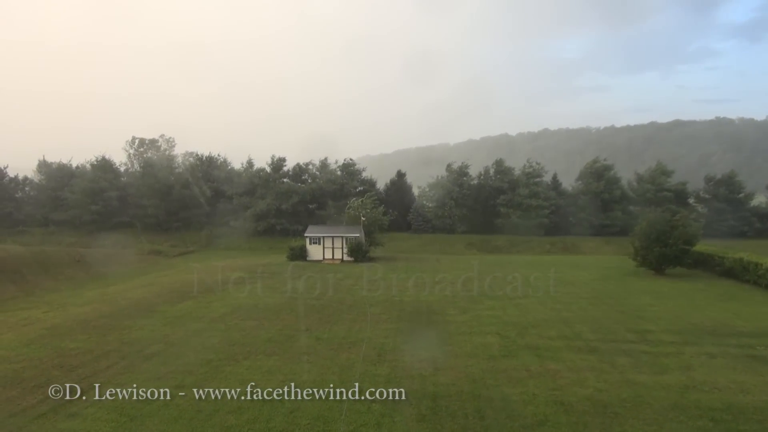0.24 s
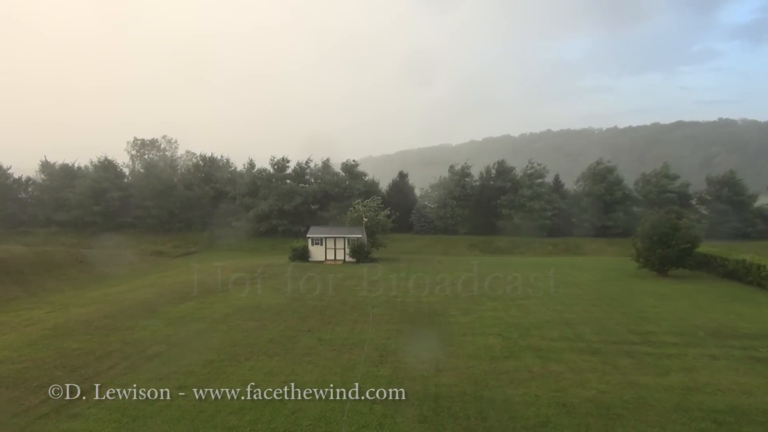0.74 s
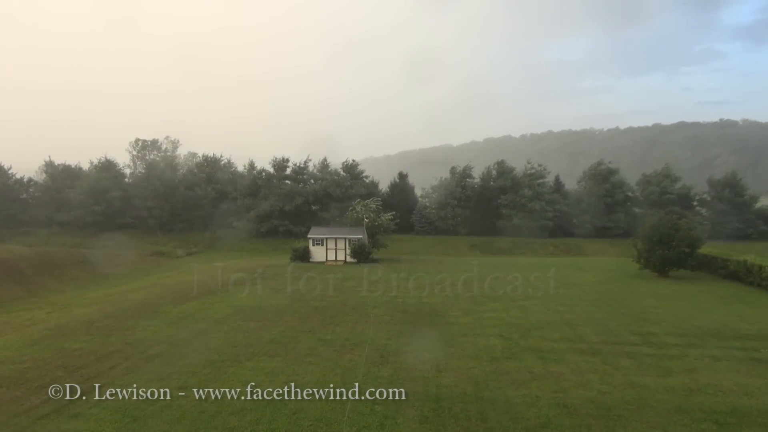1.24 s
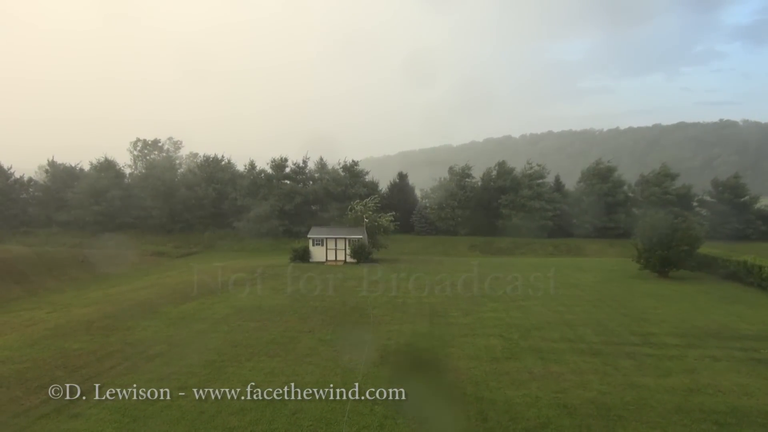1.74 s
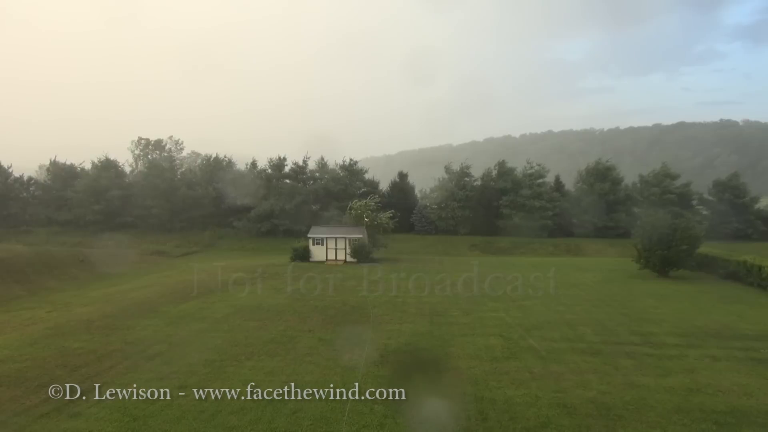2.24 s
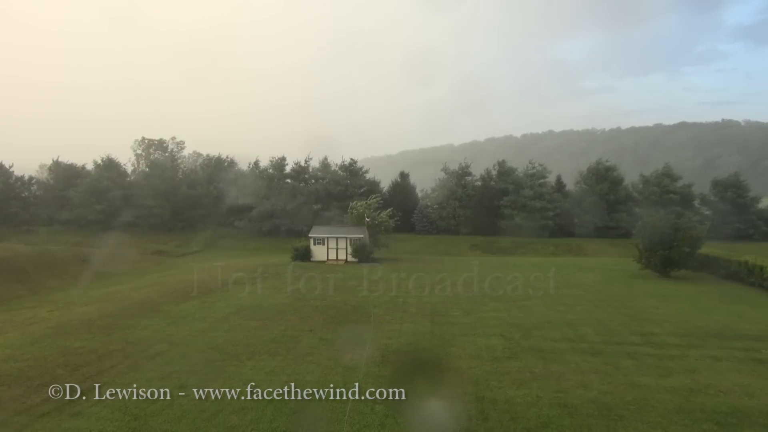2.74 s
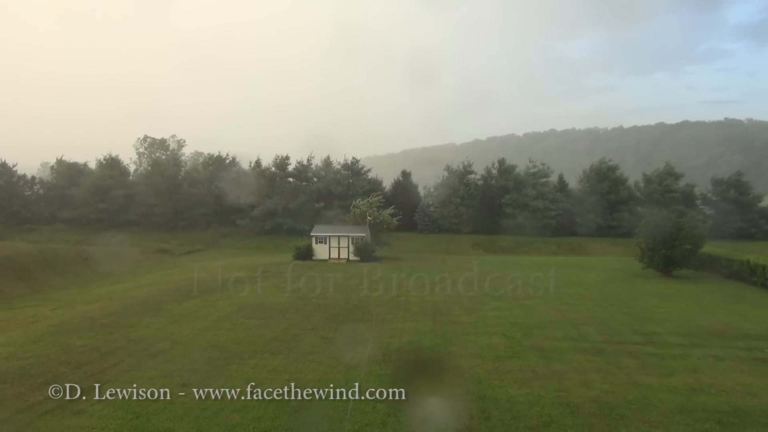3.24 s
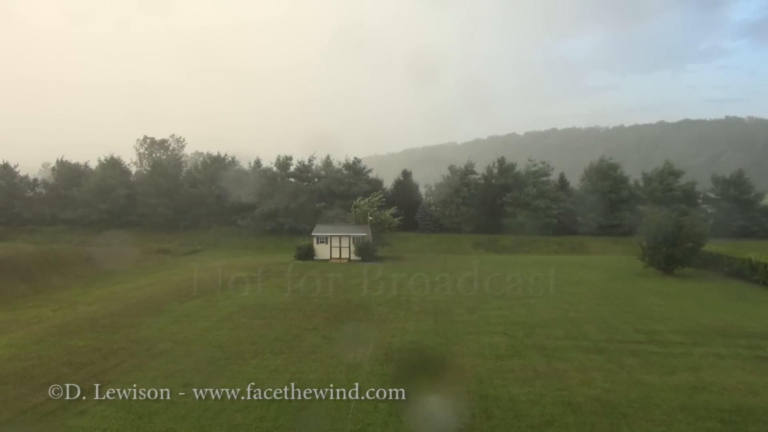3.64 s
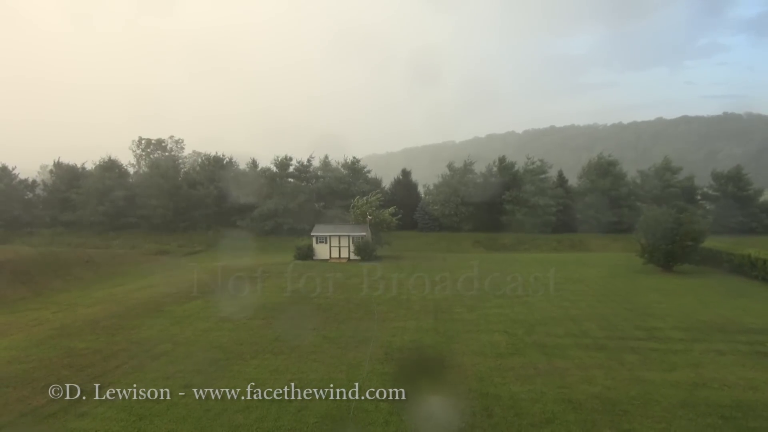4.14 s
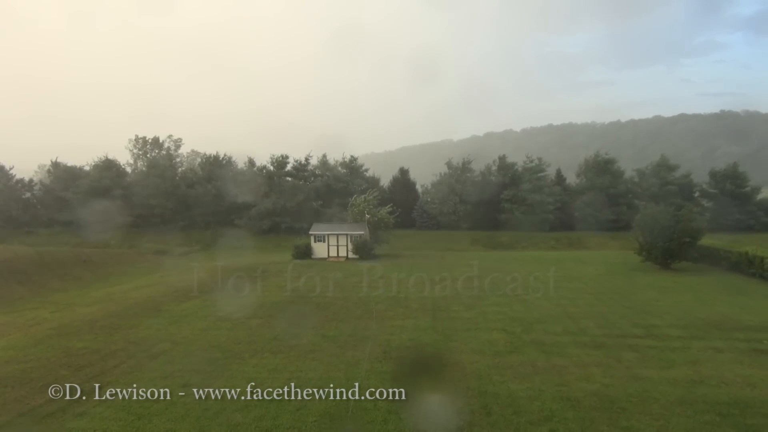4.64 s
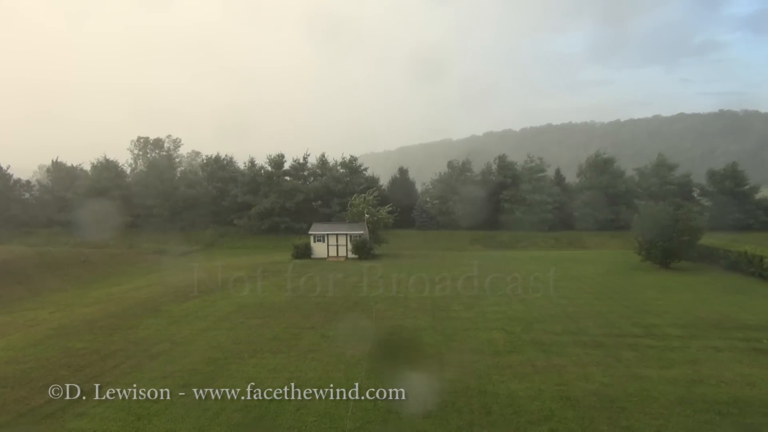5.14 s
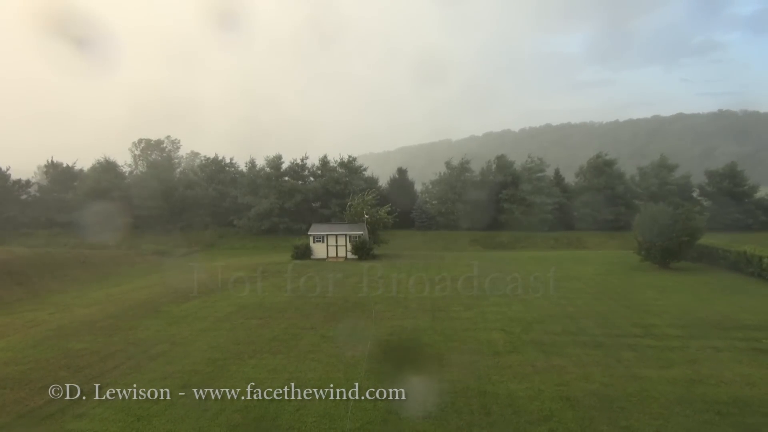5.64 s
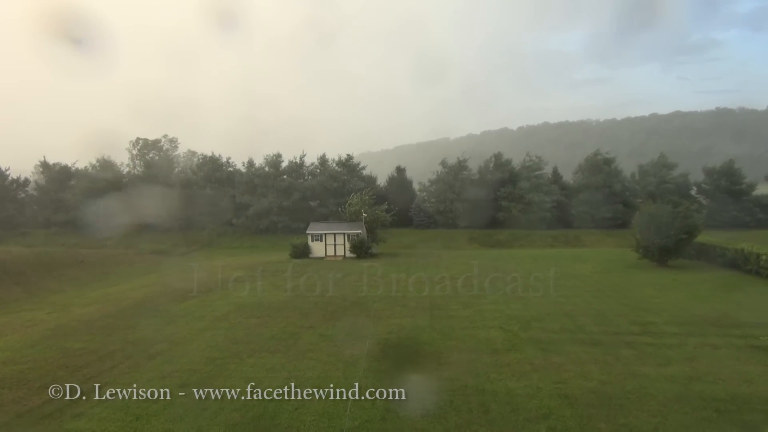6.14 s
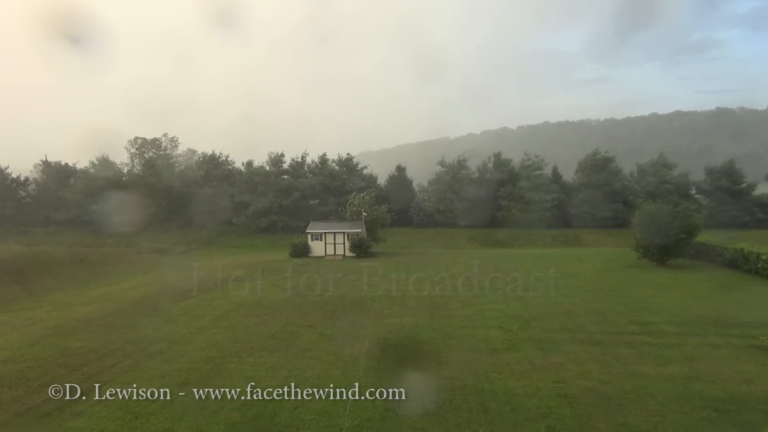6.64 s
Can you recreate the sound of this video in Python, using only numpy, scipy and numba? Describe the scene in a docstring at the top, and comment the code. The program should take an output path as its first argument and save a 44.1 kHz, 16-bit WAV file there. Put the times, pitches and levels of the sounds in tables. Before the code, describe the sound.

From 0 to about 1.4 s a low turbulent gust rushes past in several surges, fluttering over a steady, slightly grainy rain hiss from lawn and trees; only sparse faint ticks touch the glass. The gust drops away by 1.7 s, just as drops start hitting a pane close to the microphone: a rapid cluster of sharp cracks from 1.4 to 2.0 s. Irregular hits continue, with strong snaps near 2.7, 3.0, 3.2 and 3.4 s, a bright splashy group around 4.1-4.2 s, a hard crack and dull knock at 5.2 s, and hollow ringing tocks near 5.7 and 6.2 s. Lighter clicks and fine patter fill between. Cracks are dry and very short, with tiny spray and glassy ring. Uneven breeze and deep buffeting swell softly below. After 6.2 s heavy hits thin out, leaving hiss, a few ticks around 6.7 s and a last small puff.

```python
"""A gust rushes past in surges, dies, and leaves an uneven breeze and low buffeting: coloured noise on shared eddies.
Wind-driven drops strike a pane of glass close to the microphone: each cracks, sprays and briefly rings the pane.
Lighter drops click, fat ones knock dully and fine ones patter, each a short push through filters.
Rain hisses on the lawn and trees behind: noise with a grain of random clicks.
A gain control ducks after the hardest hits, then peaks are clipped and the extreme treble is cut."""
import sys
import numpy as np
from scipy import signal
from scipy.fft import rfft, irfft
from scipy.io import wavfile
from scipy.ndimage import uniform_filter1d
from numba import njit

SR = 44100
rng = np.random.default_rng(int(sys.argv[2]) if len(sys.argv) > 2 else 0)


def generate_wav(sig):
    """Save sig (samples, or channels by samples) to the path in sys.argv[1] as 16-bit PCM at SR."""
    pcm = np.round(np.clip(np.atleast_2d(sig).T, -1, 1) * 32767).astype(np.int16)
    wavfile.write(sys.argv[1], SR, pcm)


N = 304638
TIME = np.arange(N) / SR  # s
HIT = 2048  # length of one short sound, samples
HIT_TIME = np.arange(HIT) / SR  # s

# spectrum of a crack on the glass: frequency_hz [Hz], level_db [dB, relative]
CRACK_SPECTRUM = [(300, -57.5), (800, -2), (1400, 7), (2200, 8), (6000, 3), (8500, -20), (16000, -16)]
# spectrum of a heavy drop's spray: frequency_hz [Hz], level_db [dB, relative]
SPRAY_SPECTRUM = [(3000, -22.5), (5500, -2), (7200, 4.5), (8800, -3.5), (10900, -2), (12500, -6.5),
                  (14000, -14), (16000, 0)]
# modes of the pane, a short hollow tock over a longer ring:
# nominal frequency_hz [Hz], drive_db [dB, relative], nominal decay_t60_s [s]
PANE_MODES = [(1170, -10.5, 0.0067), (1371, 28.5, 0.038), (1510, 13.5, 0.033), (1660, 14.5, 0.016),
              (2600, 1, 0.066), (3900, -2.5, 0.048)]


def pane_ring(port_lag_rad):
    """Decaying modes; where the drop lands sways each one's drive, pitch, decay and lag between the ports."""
    ring = 0
    chances = rng.standard_normal((len(PANE_MODES), 4))
    for (mode_hz, drive_db, t60_s), (detune, size, lag, damping) in zip(PANE_MODES, chances):
        ring_hz = mode_hz * (1 + .02 * detune)
        port_phase = (.3 * lag - port_lag_rad / 2) * np.array([[1], [-1]])
        phase = 2 * np.pi * ring_hz * HIT_TIME + port_phase
        decay = np.exp(-np.log(1000) * HIT_TIME / t60_s * np.exp(.17 * damping))
        ring = ring + undb(drive_db + 2.5 * size) * decay * np.sin(phase)
    return ring


def drop(crack_db, ring_db, spray_db, crack_hz, splash_s):
    """One heavy drop: a sharp push and a splash crack on the glass, throw fine spray and ring the pane."""
    splash_db, rattle_db, rattle_s = -15, -32, 0.0068
    edge_db, edge_s = -12, 0.00062  # echo from the frame: level, typical delay
    scatter, spray_s = 0.92, 0.0037
    chance = rng.standard_normal((3, HIT))
    splash = undb(splash_db) * np.exp(-HIT_TIME / splash_s) + undb(rattle_db) * np.exp(-HIT_TIME / rattle_s)
    push = (HIT_TIME == 0) + splash * chance[0]
    # the wave returns inverted from the frame, after a delay that gives every drop its own colour
    edge_delay = int(edge_s * SR * rng.uniform(.5, 1.8))
    push = push - undb(edge_db) * np.roll(push, edge_delay)
    # scattered paths through the glass differ for each port
    scattered = push + scatter * splash * chance[1:]
    crack = colour(resonate(scattered, crack_hz, 0.66 * crack_hz), CRACK_SPECTRUM)
    crack *= undb(crack_db) / np.abs(crack).max(axis=1).mean()
    ring = pane_ring(port_lag_rad=1.05)
    spray_source = np.array([push, splash * chance[1]]) * np.exp(-HIT_TIME / spray_s)
    spray = colour(diffuse(spray_source), SPRAY_SPECTRUM)
    return crack * pan(2) + strike(ring, ring_db) * pan(4) + strike(spray, spray_db)


# heavy drops on the glass, levels before trim:
# start_s [s], crack_peak_db [dB], ring_db [dB], spray_db [dB], crack_centre_hz [Hz]
HEAVY_DROPS = [(1.4316, -12.5, -37.5, -16.5, 3430), (1.5513, -8.5, -25.5, -24, 2230),
               (1.6163, -11, -24.5, -19, 2100), (1.8254, -11.5, -29, -27, 3900),
               (1.8562, -14.5, -25, -20, 4100), (1.936, -18, -31, -24.5, 4800),
               (1.9627, -16.5, -36, -13.5, 3560), (2.2145, -16.5, -29.5, -47, 2600),
               (2.413, -26, -35, -23, 2030), (2.733, -5, -22, -13, 3900), (2.9736, -15, -23.5, -23, 3400),
               (3.044, -6.5, -47, -25, 3750), (3.2220, -10.5, -22, -15.5, 1930),
               (3.3547, -23, -28.5, -29, 1920), (3.369, -20, -44, -22, 2070),
               (3.386, -14.5, -32.5, -17, 5260), (3.4372, -13.5, -19, -21, 3650),
               (3.497, -32, -34, -48, 1900), (3.8347, -10, -32, -23, 3150), (4.106, -17.5, -26, -21, 1820),
               (4.142, -6, -32, -18, 2240), (4.2062, -8, -22.5, -6.5, 3920), (4.326, -30, -32.5, -36, 1830),
               (4.5162, -9.5, -19.5, -17, 3100), (4.694, -14, -31, -33.5, 2870),
               (5.077, -19, -25.5, -21, 3600), (5.1292, -20, -31.5, -30, 1800),
               (5.1838, -4.5, -24, -11.5, 3340), (5.3144, -12.5, -30, -26, 2900),
               (5.579, -24, -30.5, -28, 2230), (5.7212, -11, -17.5, -17, 3400),
               (6.0767, -17.5, -37.5, -35, 3770), (6.2085, -9, -16, -14.5, 2820),
               (6.694, -24, -37, -32, 2260)]


def big_drops(crack_gain_db, ring_gain_db, spray_gain_db, splash_s, splatter):
    """Heavy drops close to the microphone; dry ones snap, those that throw much spray splatter for longer."""
    out = np.zeros((2, N))
    for start_s, crack_db, ring_db, spray_db, crack_hz in HEAVY_DROPS:
        length_s = splash_s * undb(splatter * min(spray_db - crack_db, 0))
        sound = drop(crack_db + crack_gain_db, ring_db + ring_gain_db, spray_db + spray_gain_db,
                     crack_hz, length_s)
        add(out, start_s, sound)
    return out


# spectrum of a small drop's spray: frequency_hz [Hz], level_db [dB, relative]
FINE_SPRAY_SPECTRUM = [(3000, -45), (6000, 19), (8500, -10.5), (12500, 9), (14500, 6)]


def tick(db, hz, width=0.76, spray_db=-9):
    """A small drop clicks at its own pitch over a faint crack of the glass; the higher the click, the more spray."""
    splash_s, splash_db = 0.0011, -12
    body_db, spray_db_per_octave = -9, 6
    chance = rng.standard_normal((3, HIT))
    splash = undb(splash_db) * np.exp(-HIT_TIME / splash_s)
    push = (HIT_TIME == 0) + splash * (chance[0] + .5 * chance[1:])
    click = resonate(resonate(push, hz, width * hz), hz, width * hz)
    body = colour(push, CRACK_SPECTRUM)
    spray = colour(push, FINE_SPRAY_SPECTRUM)
    spray_level_db = db + spray_db + spray_db_per_octave * np.log2(hz / 4000)
    return strike(click, db) + strike(body, db + body_db) + strike(spray, spray_level_db)


# lighter drops on the glass, levels before trim: start_s [s], level_db [dB], click_hz [Hz]
LIGHT_DROPS = [(0.988, -44, 5000), (1.424, -36, 6500), (1.484, -37, 5560), (1.656, -40, 7000),
               (1.71, -33, 4900), (1.753, -35, 4930), (1.802, -32, 6500), (1.999, -29, 4300),
               (2.019, -30, 3940), (2.092, -42, 6200), (2.179, -36.5, 5760), (2.310, -34.5, 3350),
               (2.6849, -26, 3900), (2.826, -35, 3300), (2.915, -34.5, 3900), (2.959, -32, 4300),
               (3.231, -26, 3420), (3.275, -29.5, 3900), (3.449, -35, 4500), (3.669, -33, 4400),
               (3.843, -41, 2600), (4.006, -36, 3260), (4.719, -33.5, 2180), (4.864, -34.5, 5100),
               (5.027, -34, 5440), (5.243, -31, 2880), (5.253, -31, 4540), (5.303, -33, 5240),
               (5.3697, -27.5, 4700), (5.403, -38, 7300), (5.427, -31, 2730), (5.663, -34, 3580),
               (6.093, -34, 5230), (6.551, -46, 8800), (6.6584, -22, 5100), (6.836, -31, 5160)]


def small_drops(gain_db, pan_spread_db):
    """Lighter drops that still stand out, each a click scattered at random across the glass."""
    out = np.zeros((2, N))
    for start_s, level_db, click_hz in LIGHT_DROPS:
        add(out, start_s, tick(level_db + gain_db, click_hz) * pan(pan_spread_db * rng.standard_normal()))
    return out


# spectrum of a dull tap: frequency_hz [Hz], level_db [dB, relative]
KNOCK_SPECTRUM = [(100, -68), (300, 28), (750, 31.5), (1300, 29.5), (2500, 7), (6000, -11)]
# fat drops that knock dully, levels before trim and pan: start_s [s], peak_db [dB]
FAT_DROPS = [(1.439, -29), (1.701, -21.5), (3.82, -20), (5.046, -25.5), (5.188, -11), (5.509, -23),
             (6.209, -40)]


def knocks(gain_db, pan_db):
    """A fat drop lands softly and pushes the whole pane: a dull tap with no ring."""
    tap = colour(signal.unit_impulse((1, HIT)), KNOCK_SPECTRUM)
    tap /= np.abs(tap).max()
    out = np.zeros((2, N))
    for start_s, peak_db in FAT_DROPS:
        add(out, start_s, tap * undb(peak_db + gain_db) * pan(pan_db))
    return out


def droplets(hiss_db, start_s, sheltered, over_db, spread_db, range_db, spray_db, crowding, count):
    """Fine drops prick the glass, most faint, a few crisp; they thicken as the squall turns onto it and rain hardens."""
    out = np.zeros((2, N))
    density = np.where(TIME > start_s, 1, sheltered) * undb(crowding * hiss_db)
    fallen = np.cumsum(density)
    times = np.interp(rng.random(count), fallen / fallen[-1], TIME)
    for when, (size, pitch, side) in zip(times, rng.random((count, 3))):
        size_db = min(-spread_db * np.log(size), range_db)
        level_db = np.interp(when, TIME, hiss_db) + over_db + size_db
        prick = tick(level_db, 2200 * 2 ** (1.5 * pitch), width=0.88, spray_db=spray_db)
        add(out, when, prick * pan(10 * (side - .5)))
    return out


def wind(spectrum, db, pan_db, lag_s):
    """Turbulence at the microphone as coloured noise, reaching the right port lag_s later."""
    left, right = colour(diffuse(rng.standard_normal((2, N))), spectrum)
    air = np.array([left, np.interp(TIME - lag_s, TIME, right)])
    return unit(air) * undb(db) * pan(pan_db)


# spectrum of the gust: frequency_hz [Hz], level_db [dB, relative]
GUST_SPECTRUM = [(40, -41.5), (90, -5), (180, 0.5), (290, 2), (420, -4.5), (650, -7.5), (780, -16.5),
                 (950, -15), (1150, -24), (4000, -73)]
# the opening gust, surging several times before it dies: time_s [s], level_db [dB, before trim]
GUST_LEVEL_CURVE = [(0, -20.5), (0.1, -19.5), (0.39, -23), (0.51, -23), (0.58, -19), (0.7, -22),
                    (0.77, -27), (0.81, -21), (0.9, -20), (1.18, -23.5), (1.26, -19), (1.46, -24),
                    (1.6, -34.5), (1.75, -82)]


def gust(eddies):
    """A low rush of turbulent air that flutters with the eddies."""
    level_db = level_curve(GUST_LEVEL_CURVE) + 1.0 + 1.0 * eddies
    return wind(GUST_SPECTRUM, level_db, pan_db=2.0, lag_s=0.000086)


# spectrum of the breeze: frequency_hz [Hz], level_db [dB per Hz, relative]
BREEZE_SPECTRUM = [(50, -10), (100, -4), (190, -1.5), (280, -7), (400, -9.5), (660, -14), (780, -21),
                   (1100, -24.5), (2000, -56.5)]
# the uneven breeze that stays, then a lull and a fresh puff: time_s [s], level_db [dB, before trim]
BREEZE_LEVEL_CURVE = [(0, -34.5), (1.68, -34), (1.9, -29.5), (2.14, -39), (2.37, -28.5), (2.75, -33.5),
                      (3.1, -29.5), (3.5, -32), (4.02, -27.5), (4.22, -35.5), (4.46, -26.5), (4.75, -32.5),
                      (5.68, -31), (5.85, -39.5), (6.1, -33.5), (6.4, -42.5), (6.79, -47.5), (6.819, -30.5)]


def breeze(eddies):
    """Softer, uneven turbulence, fluttering more deeply with the eddies than the gust does."""
    level_db = level_curve(BREEZE_LEVEL_CURVE) + 1.5 + 1.83 * eddies
    return wind(BREEZE_SPECTRUM, level_db, pan_db=1.5, lag_s=0.00022)


# spectrum of the buffeting: frequency_hz [Hz], level_db [dB per Hz, relative]
BUFFET_SPECTRUM = [(15, -12), (30, -4.5), (50, 3), (90, -3.5), (140, -8), (220, -14), (400, -28.5),
                   (900, -85.5)]
# low buffeting at the microphone: time_s [s], level_db [dB, before trim]
BUFFET_LEVEL_CURVE = [(0, -45), (1.3, -39), (1.75, -38), (1.98, -35), (2.22, -42), (2.68, -31), (2.8, -51),
                      (3.07, -30.5), (3.3, -38.5), (3.95, -32.5), (4.25, -37.5), (4.8, -31), (5.4, -33),
                      (5.8, -35.5), (6.14, -30.5), (6.52, -41.5), (6.91, -33.5)]


def buffets(eddies):
    """Deep pressure rumble at the microphone, strongly swayed by the eddies."""
    level_db = level_curve(BUFFET_LEVEL_CURVE) + 3.5 + 2.14 * eddies
    return wind(BUFFET_SPECTRUM, level_db, pan_db=1.2, lag_s=0)


def impacts(rate, spread_db, range_db):
    """Randomly timed clicks, rate per second, mostly small and now and then large."""
    falls = rng.random(N) < rate / SR
    size_db = np.minimum(spread_db * rng.exponential(size=N), range_db)
    return falls * undb(size_db) * rng.choice([-1, 1], N)


# spectrum of the rain hiss: frequency_hz [Hz], level_db [dB per Hz, relative]
HISS_SPECTRUM = [(200, 6), (600, 7.5), (1050, 2.5), (1380, 5), (1700, 4.5), (2400, 1), (3500, 0),
                 (4500, -8.5), (6000, -9.5), (7500, -16), (8800, -19), (10800, -16), (13000, -27),
                 (16000, -23)]
# sheets of rain on the lawn and trees: time_s [s], hiss_db [dB, before trim]
RAIN_LEVEL_CURVE = [(0, -46), (0.42, -48), (0.52, -43.5), (0.92, -44.5), (1.008, -49.5), (1.15, -44),
                    (1.32, -47.5), (1.45, -42), (1.658, -46.5), (1.85, -42), (2.08, -50), (2.301, -46.5),
                    (2.5, -49.5), (2.949, -43.5), (3.569, -49.5), (3.829, -46.5), (4.68, -47), (4.9, -53),
                    (5.05, -44), (5.661, -45), (6.17, -53), (6.55, -46.5), (6.91, -46.5)]


def rain(db, grain_db, flicker_db):
    """Countless far drops merge to a flickering hiss; nearer ones give it grain."""
    near = np.array([impacts(rate=800, spread_db=2.5, range_db=8.0) for _ in range(2)])
    wash = rng.standard_normal((2, N)) + undb(grain_db) * unit(near)
    hiss = unit(colour(diffuse(wash), HISS_SPECTRUM))
    return hiss * undb(db + flicker_db * walk(24.83))


def undb(db):
    """Decibels to gain."""
    return 10 ** (np.asarray(db) / 20)


def unit(x):
    """Scale to rms 1."""
    return x / np.sqrt(np.mean(x ** 2))


def pan(db):
    """Left and right gains for a level difference; positive leans left."""
    return undb(np.array([[db], [-db]]) / 2)


def level_curve(points):
    """Join (time_s, level_db) points with straight lines, one value per sample."""
    return np.interp(TIME, *np.transpose(points))


def over_hz(points, size):
    """Join (frequency_hz, value) points on a log axis, one value per bin."""
    hz, value = np.transpose(points)
    return np.interp(np.log(np.fft.rfftfreq(size, 1 / SR) + 1), np.log(hz), value)


def colour(x, points):
    """Causal filter with the given spectrum, built from its cepstrum."""
    cepstrum = irfft(np.log(undb(over_hz(points, 4 * HIT))))
    # fold the cepstrum to positive times for minimum phase
    cepstrum[1:] *= 2
    cepstrum[2 * HIT:] = 0
    response = irfft(np.exp(rfft(cepstrum)))
    return signal.fftconvolve(x, response[None], axes=1)[:, :x.shape[1]]


def resonate(x, hz, width_hz):
    """Two-pole band-pass."""
    hz = min(hz, SR / 3)
    width_hz = min(width_hz, SR / 4)
    b, a = signal.iirpeak(hz, hz / width_hz, fs=SR)
    return signal.lfilter(b, a, x)


def walk(rate):
    """Random levels held 1 / rate s, smoothed twice and scaled to rms 1."""
    hold = int(SR / rate)  # samples
    held = rng.standard_normal(HIT)[np.arange(N) // hold]
    return unit(uniform_filter1d(uniform_filter1d(held, hold), hold))


# likeness of left and right: frequency_hz [Hz], correlation [0 to 1]
PORT_LIKENESS = [(30, 0.98), (120, 0.92), (250, 0.66), (500, 0.53), (2000, 0.39), (6000, 0.52),
                 (8500, 0.027), (12000, 0.93)]


def diffuse(pair):
    """Mix two signals into a field that both microphone ports partly share."""
    size = pair.shape[1]
    alike = np.clip(over_hz(PORT_LIKENESS, size), 0, 1)
    mid, side = irfft(rfft(pair) * np.sqrt([1 + alike, 1 - alike]), size)
    return np.array([mid + side, mid - side])


def strike(x, db):
    """Set a short stereo sound to a level, its whole energy counted as rms over 5 ms."""
    return x * undb(db) / np.sqrt(np.sum(x ** 2) / (2 * .005 * SR))


def add(out, start_s, sound):
    """Mix a short sound in at a time."""
    start = int(np.clip(start_s * SR, 0, N - 1))
    out[:, start:start + HIT] += sound[:, :N - start]


def scene():
    """Drops on the glass, wind and far rain; the same eddies make every part of the wind flutter."""
    hiss_db = level_curve(RAIN_LEVEL_CURVE)
    eddies = walk(24)
    heavy = big_drops(crack_gain_db=1.0, ring_gain_db=3.5, spray_gain_db=-12.5, splash_s=0.0022, splatter=0.87)
    light = small_drops(gain_db=-3.0, pan_spread_db=4.5)
    dull = knocks(gain_db=2, pan_db=12.0)
    patter = droplets(hiss_db, start_s=1.4, sheltered=.25, over_db=-8.5, spread_db=5.0, range_db=10.5,
                      spray_db=-6, crowding=1.3, count=480)
    air = gust(eddies) + breeze(eddies) + buffets(eddies)
    lawn = rain(hiss_db + 6.5, grain_db=0.0, flicker_db=1.0)
    return heavy + light + dull + patter + air + lawn


@njit
def follow(x, attack, release):
    """Envelope that rises fast and sinks slowly."""
    out, e = np.empty(len(x)), 0.
    for i in range(len(x)):
        e += (x[i] - e) * (attack if x[i] > e else release)
        out[i] = e
    return out


def gain_control(x, threshold_db, slope, attack_s, release_s, lag_s, deaf_below_hz):
    """A hard hit turns the gain down a moment later; it then creeps back. A high-pass keeps wind rumble from driving it."""
    high_pass = signal.butter(2, deaf_below_hz, "high", fs=SR, output="sos")
    loudest = np.abs(signal.sosfilt(high_pass, x)).max(axis=0)
    envelope = follow(loudest, 1 / (1 + attack_s * SR), 1 / (1 + release_s * SR))
    gain = np.maximum(envelope / undb(threshold_db), 1) ** -slope
    # a one-pole lag delays the gain change
    pole = np.exp(-1 / (lag_s * SR))
    reduction = signal.lfilter([1 - pole], [1, -pole], 1 - gain)
    return x * (1 - reduction)


def record(dry):
    """Gain control, clipped peaks and a steep treble cut."""
    held = gain_control(dry, threshold_db=-9, slope=1.67, attack_s=0.00006, release_s=0.12,
                        lag_s=0.0073, deaf_below_hz=216)
    clipped = np.clip(held, -.85, .85)
    top_cut = signal.ellip(8, .2, 70, 15600, fs=SR, output="sos")  # cutoff in Hz
    return signal.sosfilt(top_cut, clipped)


dry = scene()
out = record(dry)
generate_wav(out)
```